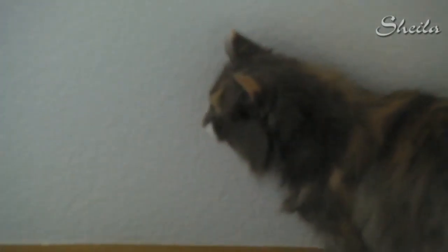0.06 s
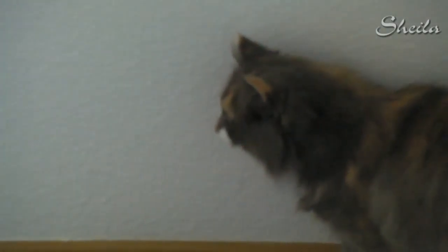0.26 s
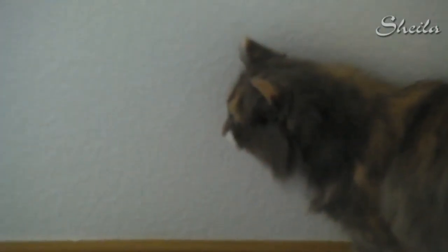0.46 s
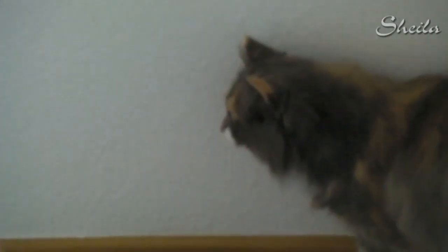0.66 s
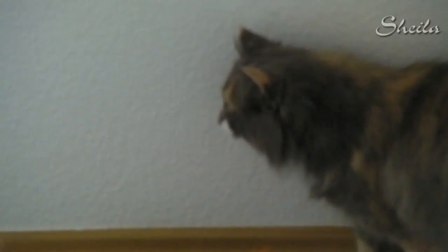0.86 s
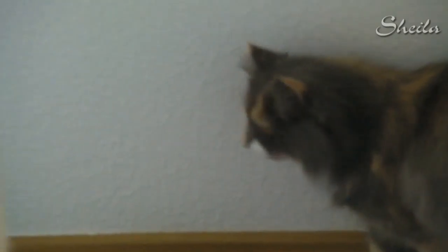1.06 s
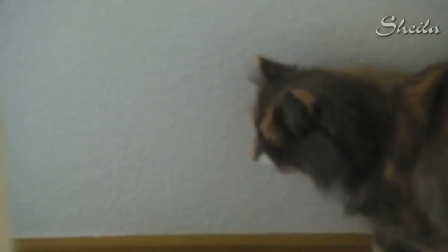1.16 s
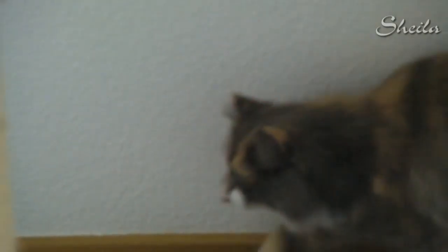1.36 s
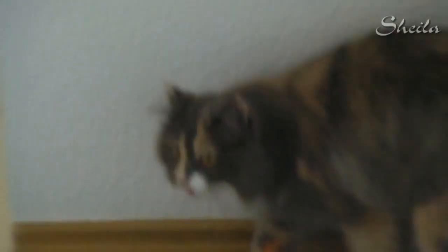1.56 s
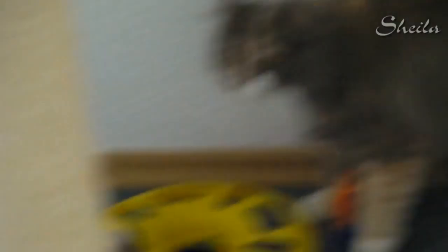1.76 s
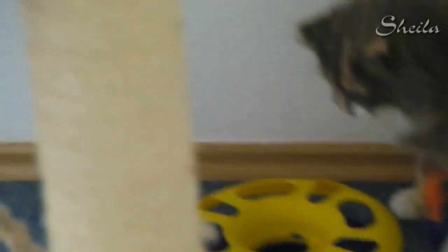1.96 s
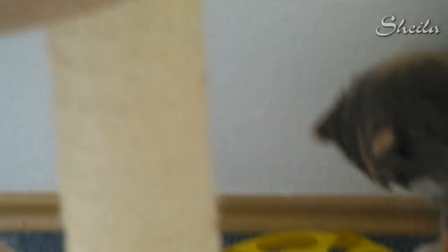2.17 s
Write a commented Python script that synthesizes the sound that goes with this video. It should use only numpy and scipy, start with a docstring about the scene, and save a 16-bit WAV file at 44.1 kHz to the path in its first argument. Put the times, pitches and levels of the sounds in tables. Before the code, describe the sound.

A cat steps on carpet, claws snagging with sharp ticks and paws thudding softly.

```python
"""A cat steps about on carpet, close to a camera's stereo microphone in a small room.
Its claws snag and pluck the pile with sharp ticks, over a fine crackle of flicking fibres.
Its paws land with dull, hollow thuds and skid with a sinking swish; a leg brushes the carpet.
The room rings briefly after snags and landings, over faint ventilation and microphone hiss."""
import sys
import numpy as np
from scipy import signal
from scipy.fft import rfft, irfft, next_fast_len
from scipy.io import wavfile
from scipy.ndimage import map_coordinates

SR = 44100
rng = np.random.default_rng(int(sys.argv[2]) if len(sys.argv) > 2 else 0)


def pcm_store(signal):
    """Save signal as 16-bit PCM."""
    levels = np.round(np.clip(np.atleast_2d(signal), -1, 1) * 32767)
    wavfile.write(sys.argv[1], SR, levels.astype(np.int16).T)


N = 97020
T = np.arange(SR // 2) / SR  # seconds into one contact

# Claws snapping free. Each row: start in seconds, level in dB, treble tilt in dB per octave.
CLAW_SNAGS = [(0.2154, -42.5, -4), (0.2373, -30.5, 4.5), (0.2525, -30.5, -9), (0.2694, -32.5, -2.5),
              (0.2872, -35, -2.5), (.342, -29, 0.5), (0.6342, -24.5, 3), (0.6536, -18.5, -1),
              (.656, -24.5, 9), (0.6598, -35, -4), (0.6679, -27, 0), (.693, -31, 1), (0.7842, -38.5, 4),
              (0.832, -35.5, 7), (.8918, -41.5, -12), (.9062, -45.5, -5), (1.0038, -43, -17),
              (1.022, -34.5, 2), (1.277, -45, 1), (1.3937, -33, 5), (1.677, -44, -4), (1.7691, -42.5, -2),
              (1.7758, -45.5, 3), (1.8165, -40, 17), (1.843, -41, 1), (1.9, -33, 1), (1.944, -34, 1),
              (2.0768, -41, 5)]
# The ring of a snag. Each row: frequency in Hz, level in dB, t60 in seconds.
CLAW_MODES = [(3590, -8, 0.021), (4167, 2, .014), (4643, -9.5, 0.038)]
# Colour of snags and fibre flicks. Each row: frequency in Hz, level in dB.
SNAP_COLOUR = [(200, -14), (1100, -10), (2800, 1.5), (4400, 5), (6500, -1), (8500, -6), (11000, -8.5),
               (15500, -27)]
# Paw landings. Each row: start in seconds, hollow ring in dB, its pitch ratio, floor thump in dB,
# pad slap in dB, slap cut-off in Hz.
LANDINGS = [(0.667, -58, .98, -60, -42, 3000), (0.681, -37.5, .98, -61.5, -41.5, 3000),
            (1.0219, -35, 0.93, -47.5, -33.5, 5800), (1.244, -42.5, .88, -45.5, -37.5, 3520),
            (1.380, -29, 1.01, -51, -34, 7500), (1.694, -48.5, 1.05, -72, -48.5, 4940)]
# Weight settling after a step. Each row: start in seconds, thump level in dB.
WEIGHT_SETTLES = [(0.715, -55.5), (1.064, -49), (1.281, -41), (1.432, -56)]
# The hollow ring under a paw. Each row: frequency in Hz, level in dB, t60 in seconds.
HOLLOW_MODES = [(169.7, -17, 0.22), (376, -15.5, 0.39), (415, 5.5, 0.07), (439.7, -8.5, 0.33),
                (624, -14, 0.12), (1218.5, -11.5, 0.086)]
# The floor's thump. Each row: frequency in Hz, level in dB, t60 in seconds.
FLOOR_MODES = [(65, -14, 0.17), (90, 5, 0.13), (118, -5.5, 0.15), (194.3, 0, 0.11)]
# A pad's slap. Each row: frequency in Hz, level in dB.
SLAP_COLOUR = [(60, -8.5), (200, 13), (270, -19.5), (370, -12), (680, -5), (1400, -10), (2400, -6),
               (6000, -13), (15000, -12)]
# Fibres scratching under the paws. Each row: time in seconds, level in dB.
SCRATCH_LEVELS = [(0, -55), (.08, -82), (.21, -68), (.24, -50), (.29, -47.5), (.42, -66), (.55, -55),
                  (.615, -55), (.630, -50), (.69, -44.5), (.79, -65.5), (.88, -61), (1.01, -52.5),
                  (1.2, -68), (1.40, -57), (1.655, -70), (1.685, -58), (1.745, -71), (1.85, -50.5),
                  (1.92, -50), (2.08, -67.5), (2.18, -53.5)]
# Paws skidding. Each row: start in seconds, level in dB, t60 in seconds, starting speed as a ratio.
PAW_SKIDS = [(.466, -44.5, .42, 1.0), (1.682, -45, .09, 1.35)]
# A skid's swish at speed ratio 1. Each row: frequency in Hz, level in dB.
SKID_COLOUR = [(200, -19), (520, 2.5), (820, 2.5), (980, -8), (1250, -2.5), (1600, -13.5), (1950, -4.5),
               (2400, -24), (8000, -31.5)]
# A leg brushing the carpet. Each row: time in seconds, level in dB.
BRUSH_LEVELS = [(0, -55.5), (.12, -67), (.455, -67.5), (.56, -47.5), (.72, -53.5), (.93, -66),
                (1.08, -52.5), (1.3, -62), (1.45, -53), (1.64, -71), (1.735, -61), (1.82, -67), (2.1, -68),
                (2.19, -59.5)]
# Colour of that rub. Each row: frequency in Hz, level in dB.
BRUSH_COLOUR = [(40, -32), (100, -14.5), (270, -17), (425, 3.5), (560, -15.5), (900, -15.5), (2200, -16.5),
                (12000, -39)]
# The small room's decay. Each row: frequency in Hz, t60 in seconds.
ROOM_DECAY = [(400, 0.45), (1800, 0.24), (5000, 0.1)]
# Ventilation and hiss. Each row: frequency in Hz, level in dB.
AIR_COLOUR = [(25, -10), (100, 0), (270, -11.5), (420, -4), (640, -7.5), (1500, -14.5), (2850, -12.5),
              (5900, -11), (15500, -21)]
# Cat and room at the microphone. Each row: frequency in Hz, left-right correlation.
CAT_LIKENESS = [(400, 0.99), (3500, 0.96), (8000, 0.62), (13000, 0.2)]
# The wider background. Each row: frequency in Hz, left-right correlation.
AIR_LIKENESS = [(100, 0.86), (4000, 0.3)]

SNAP_ATTACK_S, SNAP_T60_S, TILT_FROM_HZ, CLAW_RING_DB = 0.0004, 0.011, 4300, -4
PAD_ATTACK_S, SLAP_T60_S = 0.0018, 0.077
FLICKS_PER_S, FLICK_SPREAD_DB = 6000, 0.84


def claw_snags():
    """Each claw plucks free of the pile with a short snap, dull or bright, and a quick ring."""
    out = np.zeros((2, N))
    for start, db, tilt_db in CLAW_SNAGS:
        colour = [(hz, a + tilt_db * max(0, np.log2(hz / TILT_FROM_HZ))) for hz, a in SNAP_COLOUR]
        snap = noise(colour, len(T)) * rise(SNAP_ATTACK_S) * fade(SNAP_T60_S)
        snap += amp(CLAW_RING_DB) * ring(CLAW_MODES, SNAP_ATTACK_S)
        add(out, start, amp(db) * in_room(low_cut(snap, hz=730), wet_db=-4))
    return out


def paw_landings():
    """A pad slaps down, rings the hollow body under it and thumps the floor; the weight settles."""
    out = np.zeros((2, N))
    for start, ring_db, pitch, thump_db, slap_db, top_hz in LANDINGS:
        softened = [(hz, db - 10 * np.log10(1 + (hz / top_hz) ** 8)) for hz, db in SLAP_COLOUR]
        slap = noise(softened, len(T)) * rise(PAD_ATTACK_S) * fade(SLAP_T60_S)
        modes = [(hz * pitch, db, t60) for hz, db, t60 in HOLLOW_MODES]
        add(out, start, amp(ring_db) * in_room(ring(modes, attack_s=0.0031), wet_db=-9))
        add(out, start, amp(thump_db) * ring(FLOOR_MODES, attack_s=0.0013))
        add(out, start, amp(slap_db) * in_room(low_cut(slap, hz=307), wet_db=-3))
    for start, db in WEIGHT_SETTLES:
        add(out, start, amp(db) * ring(FLOOR_MODES, attack_s=0.0037))
    return out


def fibre_scratch(peak_hz=4290, half_width_hz=170, peak_db=1.5):
    """Countless fibres flick past the claws and set them ringing."""
    flicks = (rng.random((2, N)) < FLICKS_PER_S / SR) * rng.standard_normal((2, N))
    sizes = amp(FLICK_SPREAD_DB * rng.exponential(size=(2, N)))
    resonance = lambda hz: amp(peak_db / (1 + ((hz - peak_hz) / half_width_hz) ** 2))
    crackle = filtered(flicks * sizes, resonance)
    return level(SCRATCH_LEVELS) * stereo(crackle, SNAP_COLOUR, CAT_LIKENESS)


def paw_skids(end_share=0.7, slowing_s=0.1):
    """A paw skids over the pile; its swish sinks in pitch as it slows and fades."""
    slowing = end_share + (1 - end_share) * np.exp(-T / slowing_s)
    out = np.zeros((2, N))
    for start, db, t60, first_speed in PAW_SKIDS:
        pile = noise(SKID_COLOUR, len(T))
        position = np.cumsum(first_speed * slowing)
        swish = np.array([map_coordinates(side, [position]) for side in pile])
        add(out, start, amp(db) * swish * rise(PAD_ATTACK_S) * fade(t60))
    return out


def leg_brush():
    """The dull rub of a leg along the carpet."""
    return level(BRUSH_LEVELS) * noise(BRUSH_COLOUR, N)


def near_walls(x, count=8, span_s=0.023, echo_db=-11.5):
    """Weak early echoes reach the microphone off the wall, floor and furniture."""
    delays = rng.uniform(0.0752, 1, count) * span_s
    signs = rng.choice([-1, 1], count)
    echoes = lambda hz: sum(g * np.exp(-2j * np.pi * hz * d) for d, g in zip(delays, signs))
    return filtered(x, lambda hz: 1 + amp(echo_db) / np.sqrt(count) * echoes(hz))


def in_room(x, wet_db, wall_delay_s=0.0016):
    """A close contact, then the room's diffuse answer, its treble dying first."""
    direct = x * np.ones((2, 1))
    white = noise([(1, 0), (SR, 0)], len(T))
    hz, t, spectra = signal.stft(white, SR, nperseg=256)
    decay = np.exp(-np.log(1000) * t / along(ROOM_DECAY, hz)[:, None])
    tail = signal.istft(spectra * decay, SR)[1][:, :len(T)]
    tail *= 1 - np.exp(-(T / wall_delay_s) ** 2)
    tail /= np.linalg.norm(tail[0])
    wet = signal.fftconvolve(direct.mean(0)[None], tail, axes=1)[:, :len(T)]
    return direct + amp(wet_db) * wet


def room_tone(db=-61):
    """Faint, steady ventilation and microphone hiss."""
    return amp(db) * noise(AIR_COLOUR, N, AIR_LIKENESS)


def ring(modes, attack_s, detune=0.008):
    """Damped modes, a little different in level and pitch at each blow."""
    chance = rng.standard_normal((len(modes), 2))
    tones = sum(amp(db + stray_db) * fade(t60) * np.sin(2 * np.pi * hz * (1 + detune * stray) * T)
                for (hz, db, t60), (stray_db, stray) in zip(modes, chance))
    return tones * rise(attack_s)


def low_cut(x, hz):
    """Snaps and slaps carry little bass; the low end is left to the floor's thump."""
    return signal.sosfilt(signal.butter(2, hz, "highpass", fs=SR, output="sos"), x)


def noise(colour, samples, likeness=CAT_LIKENESS):
    """Coloured stereo noise, rms 1."""
    return stereo(rng.standard_normal((2, samples)), colour, likeness)


def stereo(pair, colour, likeness):
    """Colour two unrelated signals and blend them into left and right, rms 1."""
    def response(hz):
        angle = np.arccos(np.clip(along(likeness, hz), -1, 1)) / 2
        return amp(along(colour, hz)) * [np.cos(angle), np.sin(angle)]
    mid, side = filtered(pair, response)
    both = np.array([mid + side, mid - side])
    return both / np.sqrt(np.mean(both ** 2) + 1e-20)


def filtered(x, response):
    """Shape x by a gain that depends on frequency."""
    n = x.shape[-1]
    padded = next_fast_len(n + 8192)
    return irfft(rfft(x, padded) * response(np.fft.rfftfreq(padded, 1 / SR)), padded)[..., :n]


def amp(db):
    """Decibels to gain."""
    return 10 ** (np.asarray(db) / 20)


def along(points, hz):
    """Read (Hz, value) points on a log axis."""
    freqs, values = np.transpose(points)
    return np.interp(np.log(hz + 1), np.log(freqs + 1), values)


def level(points):
    """Gain per sample from (seconds, dB) points."""
    return amp(np.interp(np.arange(N) / SR, *np.transpose(points)))


def rise(attack_s):
    """A contact's onset, from 0 towards 1."""
    return 1 - np.exp(-T / attack_s)


def fade(t60):
    """Decay by 60 dB in t60 seconds."""
    return np.exp(-np.log(1000) * T / t60)


def add(out, start_s, x):
    """Mix x into out from start_s on."""
    part = out[:, max(0, round(start_s * SR)):][:, :x.shape[-1]]
    part += x[..., :part.shape[1]]


def scene():
    """The cat close to the microphone, room tone behind it."""
    background = room_tone()
    claws = near_walls(claw_snags() + fibre_scratch())
    return claws + paw_landings() + paw_skids() + leg_brush() + background


def record(dry, notch_hz=7770, half_width_hz=160, top_hz=15800):
    """The camera has a narrow notch in the treble and a band limit."""
    notch = lambda hz: 1 - np.exp(-((hz - notch_hz) / half_width_hz) ** 2)
    return filtered(dry, lambda hz: notch(hz) * (hz < top_hz))


dry = scene()
out = record(dry)
pcm_store(out)
```